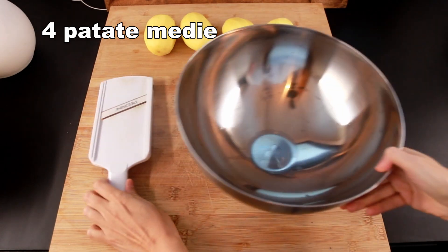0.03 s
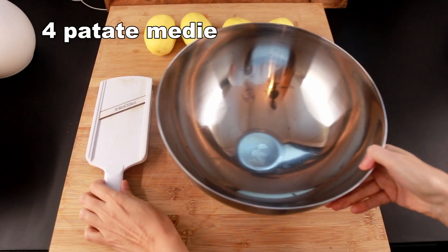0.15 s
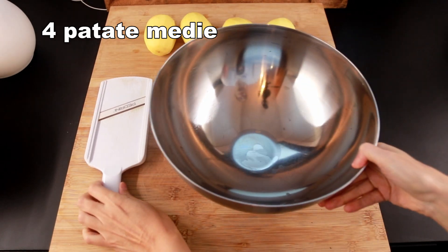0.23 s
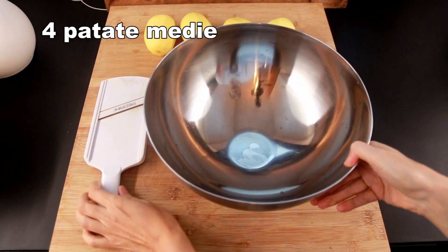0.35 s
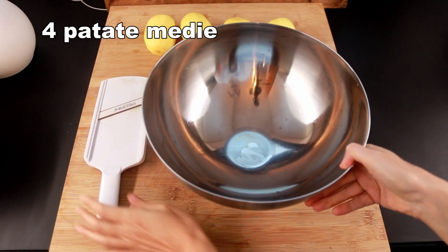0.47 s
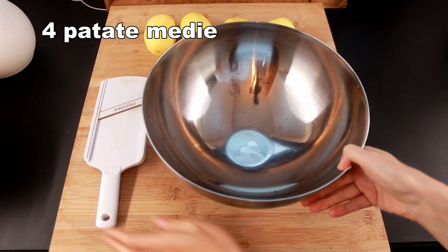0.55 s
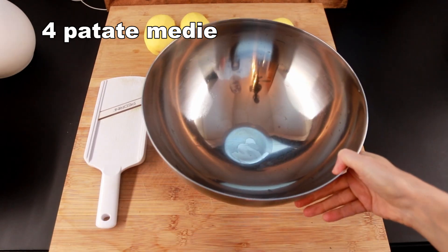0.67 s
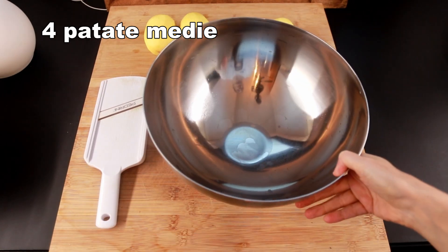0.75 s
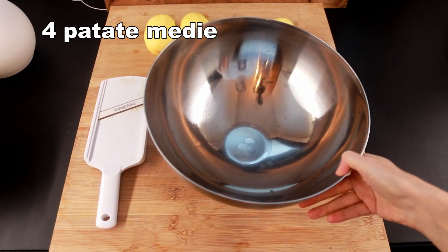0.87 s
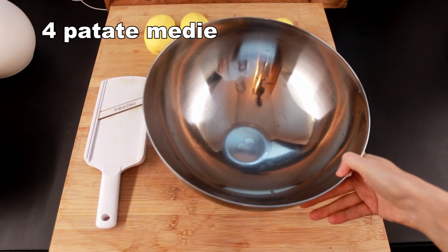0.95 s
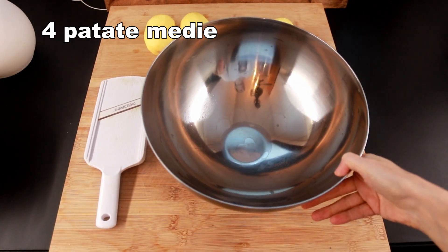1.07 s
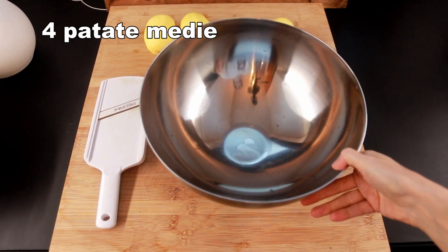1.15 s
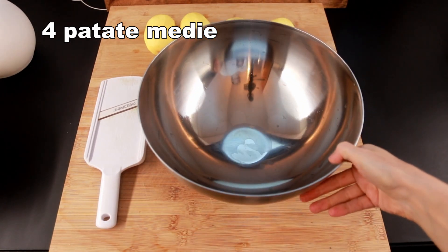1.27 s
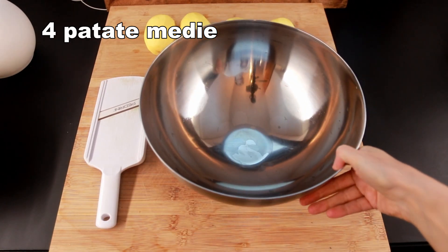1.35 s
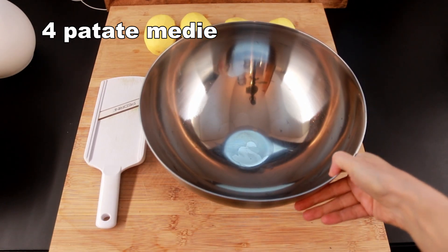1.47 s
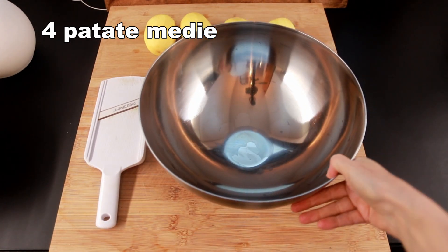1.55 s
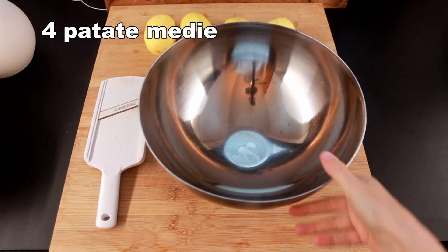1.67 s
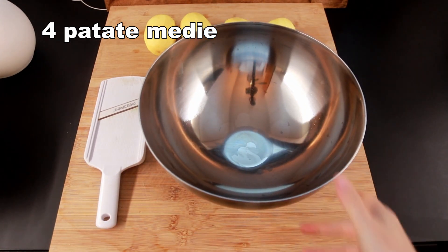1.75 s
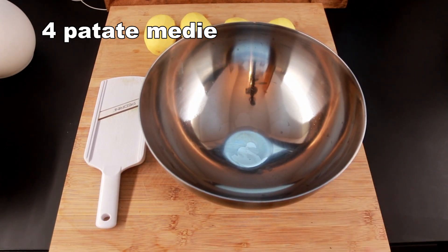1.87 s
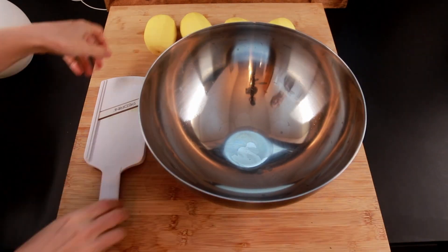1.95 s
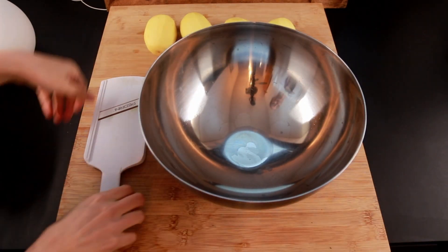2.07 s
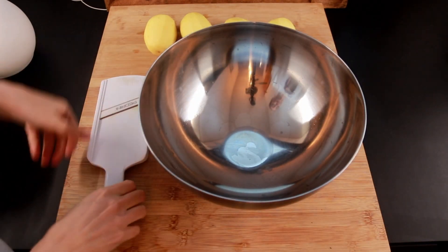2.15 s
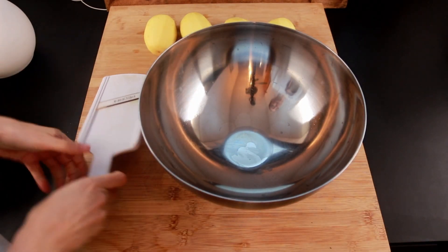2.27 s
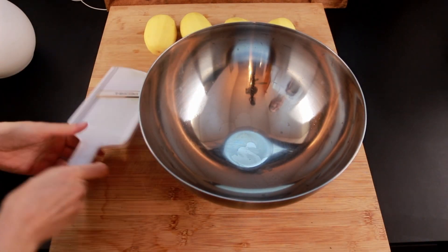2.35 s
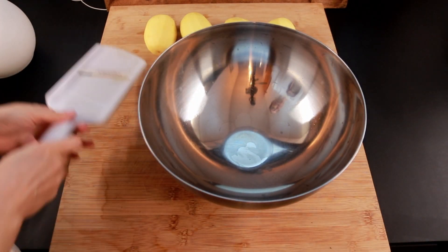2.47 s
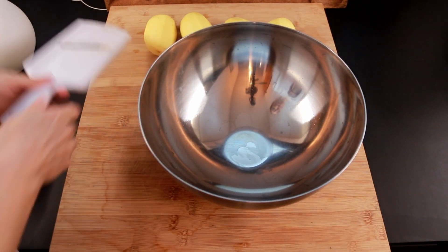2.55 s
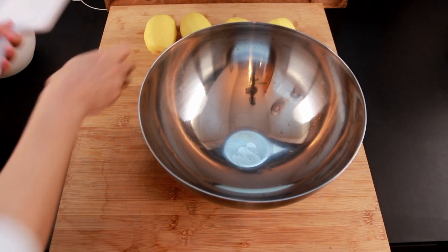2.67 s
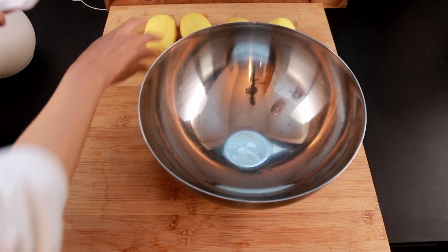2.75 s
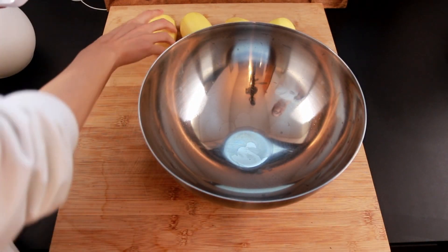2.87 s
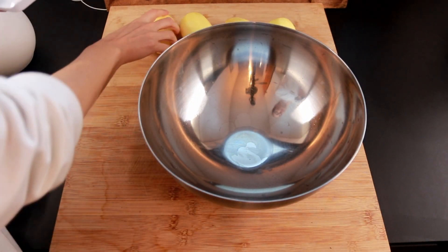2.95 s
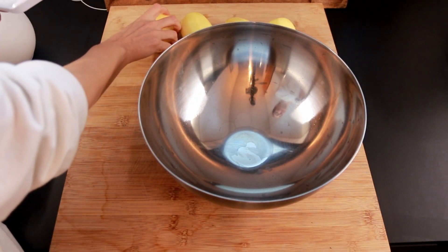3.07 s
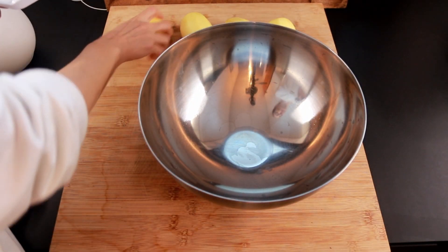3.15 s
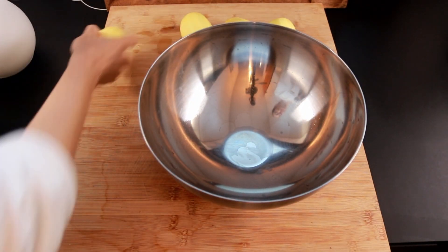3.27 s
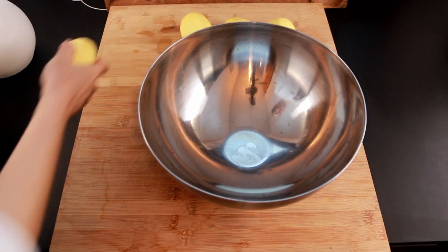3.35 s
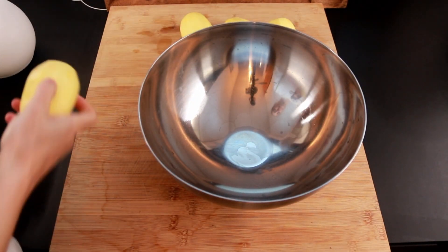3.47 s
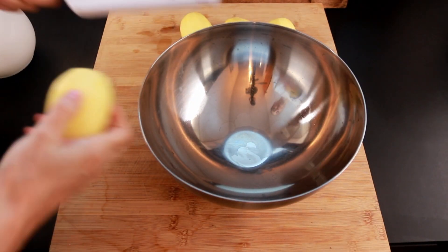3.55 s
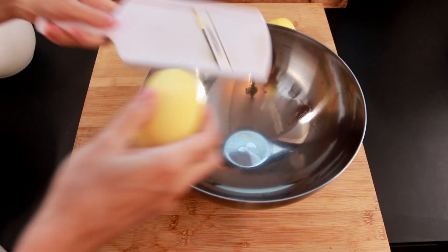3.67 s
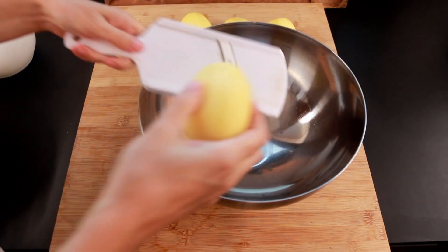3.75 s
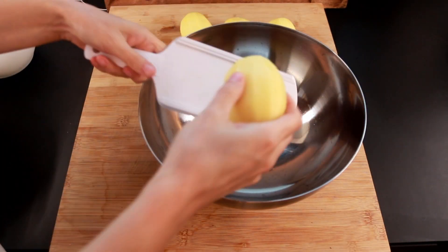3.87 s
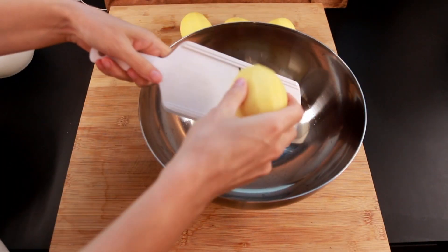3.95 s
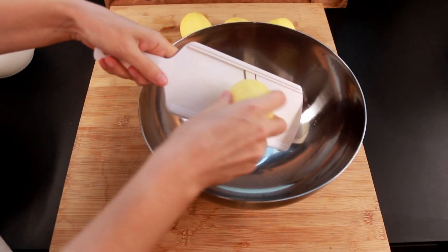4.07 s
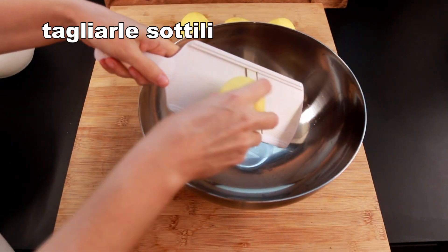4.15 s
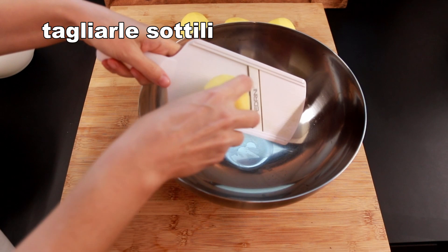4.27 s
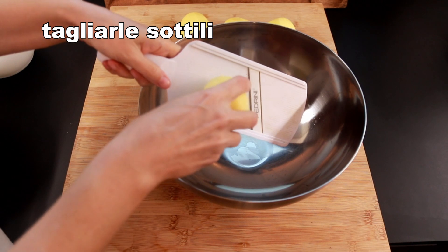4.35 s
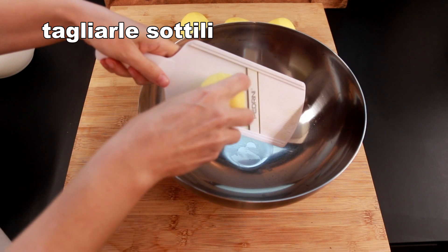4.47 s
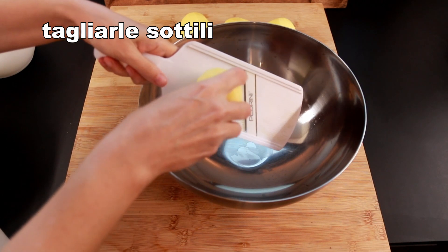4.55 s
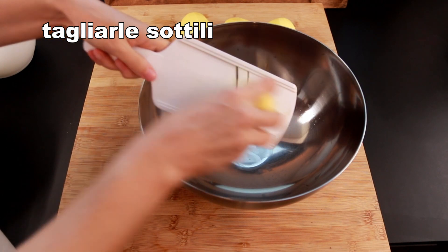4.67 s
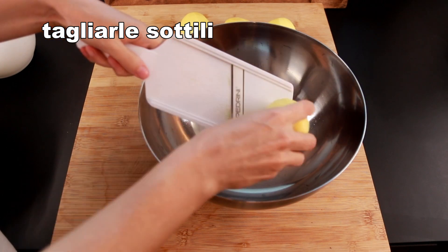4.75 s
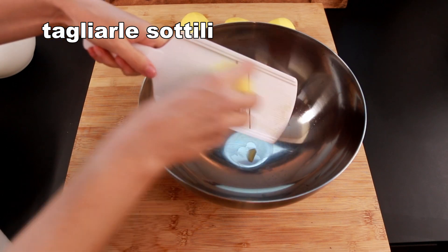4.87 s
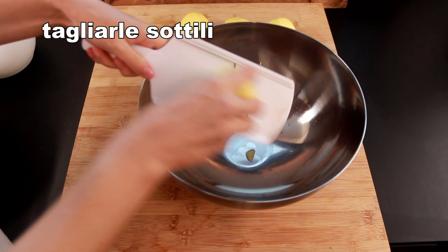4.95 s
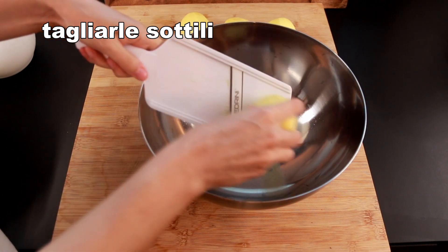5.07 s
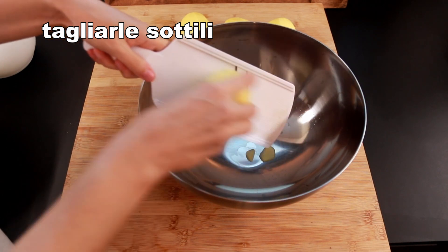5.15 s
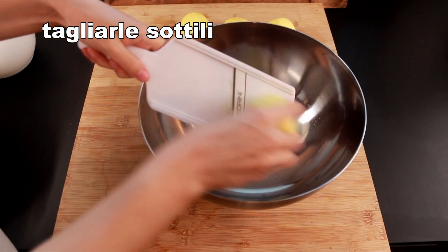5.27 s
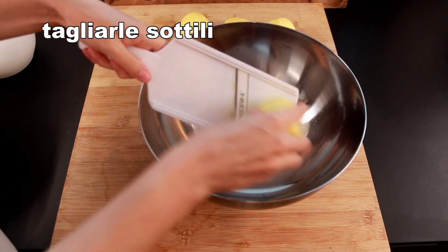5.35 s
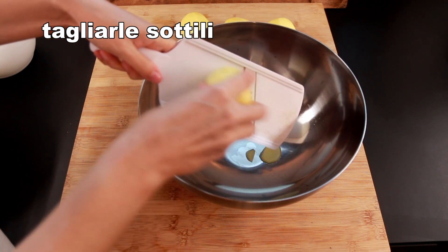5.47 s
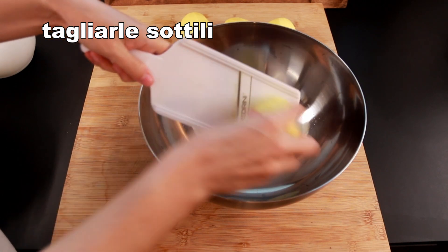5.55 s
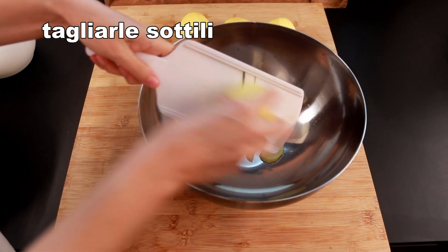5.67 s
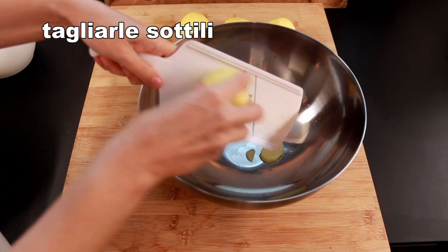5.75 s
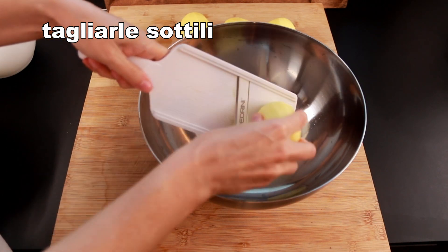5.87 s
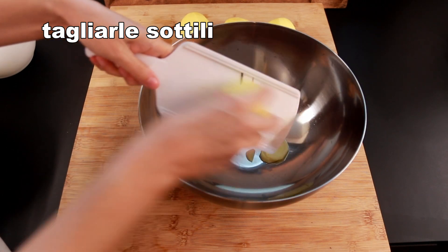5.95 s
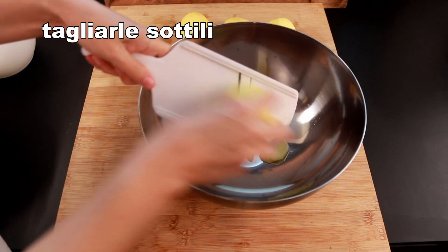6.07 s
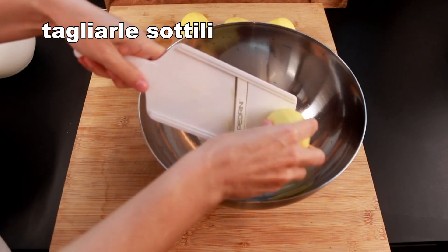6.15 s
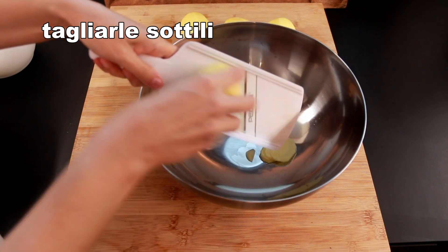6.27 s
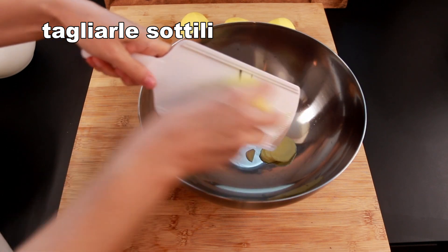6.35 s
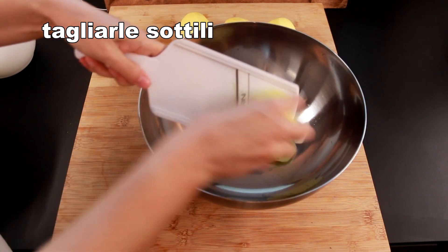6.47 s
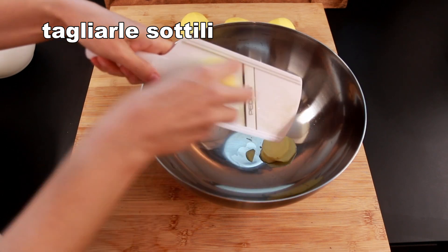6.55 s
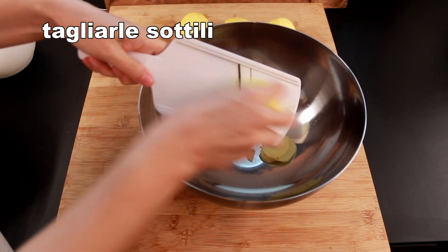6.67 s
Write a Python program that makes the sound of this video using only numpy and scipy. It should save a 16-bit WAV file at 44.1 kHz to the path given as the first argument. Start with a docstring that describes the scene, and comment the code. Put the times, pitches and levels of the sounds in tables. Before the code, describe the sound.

Plastic slicer clacks onto a wooden board, a steel bowl thumps down, then quick wet potato slicing strokes knock over the bowl in a quiet kitchen.

```python
"""A quiet kitchen, direct sound well above the room, stereo microphone: air, a far hum and soft rustle at first.
First a plastic slicer, then a steel bowl is set on a wooden board: hollow pops, ringing modes, cracks, thumps.
The slicer is picked up and rested on the bowl: slipping rattle, rubs, soft thuds, ticks and rim knocks.
Last a raw potato is cut in quick strokes over a low noisy bed: wet hiss from noise and crunches,
a snap at each cut, slices dropping on steel, and two bumps over the blade step on every return."""
import sys
import numpy as np
from scipy import signal
from scipy.fft import rfft, irfft
from scipy.io import wavfile

SR = 44100
rng = np.random.default_rng(int(sys.argv[2]) if len(sys.argv) > 2 else 0)


def unload_wav(signal):
    """Save mono or channel-first audio to the path in sys.argv[1] as 16-bit WAV at rate SR, clipped to [-1, 1]."""
    wavfile.write(
        sys.argv[1],
        SR,
        np.round(np.clip(np.atleast_2d(signal).T, -1, 1) * 32767).astype(np.int16),
    )


N = 296352
TIME = np.arange(N) / SR

# kitchen air, relative spectrum: (f/Hz, level/dB per Hz)
AIR_SPECTRUM = [(18, -34.5), (30, 0), (239, -5.5), (303, -3), (394, -7), (540, -11), (1430, -16.5),
                (3310, -22), (4080, -19), (13300, -27), (16000, -24)]
AIR_DB, AIR_SIDE_DB = -69.5, -15     # the side is relative to the middle
# far appliance tones: (f/Hz, level/dB)
HUM_TONES = [(388, -73), (405, -75.5)]
# soft rustle of sleeves and hands, then a low noisy bed under the slicing: (t/s, level/dB)
RUSTLE_AND_BED_LEVEL = [(0, -65), (.3, -53.5), (.86, -68), (1.25, -81), (1.45, -62.5), (2.02, -67),
                        (2.04, -80.5), (2.3, -60), (2.5, -67.5), (2.949, -65), (3.05, -76), (3.3, -75),
                        (3.5, -68.5), (3.72, -75.5), (3.76, -64.5), (4.02, -68.5), (4.3, -100), (4.75, -80),
                        (4.98, -67), (6.72, -58.5)]
# rustle and bed, relative spectrum: (f/Hz, level/dB per Hz)
RUSTLE_AND_BED_SPECTRUM = [(290, -54), (500, 2.5), (631, -4), (761, 0.5), (906, -2), (1640, 1), (3200, -6),
                           (4400, -3.5), (16000, -30.5)]

# slicer, then bowl, touching the board:
# (t/s, body level/dB, pop f/Hz, crack level/dB, thump level/dB, ring after the pop level/dB, favoured mode f/Hz)
SLICER_BLOWS = [(.101, -22, 2120, -39, -70.5, -18, 2000), (.18, -11.5, 440, -24.5, -26, -1.5, 1100),
                (.361, -11.5, 1210, -29, -24.5, 0.5, 1100)]
BOWL_BLOWS = [(1.359, -30.5, 226, -44, -51, -2, 226), (1.434, -24, 510, -39, -34, -2, 400),
              (1.515, -24, 376, -43.5, -35.5, -5.5, 297)]
# modes of each pair of bodies in contact: (f/Hz, level/dB, t60/s)
SLICER_BOARD_MODES = [(130.7, -17.5, 0.13), (221.5, -9.5, 0.25), (302, -13, 0.2), (488, -11.5, 0.23),
                      (1100, -13.5, 0.36), (1563, -12.5, 0.12), (1795, -10.5, 0.15), (2250, -17.5, 0.42),
                      (2310, -20.5, 0.23), (2424, -12.5, .2), (2560, -9, 0.1), (3300, -27.5, .12),
                      (4150, -24, 0.16), (4700, -26, 0.1), (5350, -29.5, .15)]
BOWL_BOARD_MODES = [(114, -20, 0.37), (226, 2, 0.24), (337.5, -5.5, 0.3), (380, -8, 0.24), (512, -1, 0.26),
                    (606, -3, 0.16), (870, 1.5, 0.12), (1057, 3, 0.049), (1500, 7, 0.027),
                    (2160, -4, 0.097), (2325, -1.5, 0.085), (2600, -15, 0.07)]
SLICER_BOWL_MODES = [(238.5, -5.5, 0.12), (410.4, 0.5, 0.037), (492.5, -8.5, 0.22), (599, -1.5, 0.067),
                     (770, -2.5, 0.027), (895, 2, 0.034), (960, -6, 0.065), (1012, -9, 0.18),
                     (1584, -5.5, 0.058), (2365, -18, 0.043), (2800, -10.5, 0.07), (4150, -16, .06)]
# decay of the room by band: (f/Hz, t60/s)
ROOM_DECAY = [(120, 0.81), (500, 0.55), (2000, 0.39), (5000, 0.47), (12000, 0.24)]
ROOM_DB = -13.5

# fingers sliding on steel: (t/s, length t/s, f/Hz, level/dB)
FINGER_SLIDES = [(0.693, 0.15, 5350, -68.5), (0.744, 0.073, 4150, -78), (1.097, 0.2, 6000, -78),
                 (3.08, 0.33, 5840, -84), (4.25, 0.86, 4150, -90)]
# soft thuds through the table: (t/s, peak level/dB, f/Hz)
TABLE_THUDS = [(1.81, -60, 56), (2.179, -55, 54.4), (2.309, -48, 80), (3.02, -53, 103),
               (3.079, -45.5, 47.5), (3.598, -58.5, 74.7)]
# slicer dragged or shifted: (t/s, level/dB, length t/s, centre f/Hz)
SLICER_DRAGS = [(1.848, -61.5, 0.025, 1500), (2.084, -61, 0.037, 1100), (2.273, -45.5, 0.025, 1000),
                (2.416, -50, 0.037, 1500), ]
# hands rubbing over board and slicer:
# (t/s, hiss level/dB, length t/s, rise t/s, dullness 0-1, fall t60/s)
HAND_RUBS = [(1.919, -57, 0.1014, 0.0022, 0.83, 0.008), (2.237, -53, 0.0058, 0.0011, 0, 0.36),
             (2.553, -67, 0.073, 0.0068, 0.35, 0.31)]
# potato or nail ticking on the blade: (t/s, level/dB, ring f/Hz)
BLADE_TICKS = [(1.9343, -34, 3300), (2.242, -32.5, 5600), (4.949, -27.5, 2540), (4.951, -28, 6130),
               (5.234, -36, 2910), (5.405, -38, 2850), (5.493, -26, 2570), (5.769, -36, 2600),
               (5.778, -30, 4700), (6.038, -39.5, 4530), (6.052, -25, 6060), (6.321, -25.5, 5770),
               (6.616, -40, 4600)]
TICK_T60_S, TICK_TAIL_S = 0.013, 0.18

# slicer knocking on the bowl rim, mostly as the hand turns:
# (t/s, body level/dB, pop f/Hz, thump level/dB, favoured mode f/Hz)
BOWL_RIM_KNOCKS = [(4.179, -38.5, 654, -37, 587), (4.452, -52, 1100, -86, 1000),
                   (4.937, -57, 423, -46, 400), (5.028, -39, 1800, -60, 2800), (5.102, -41, 925, -62, 1000),
                   (5.499, -34, 493, -43, 252), (5.78, -36.5, 424, -53, 250), (6.052, -29, 1380, -48, 600),
                   (6.304, -37, 470, -52, 250), (6.599, -38.5, 1460, -42, 1010)]
RIM_CRACK_DB, RIM_RING_DB = -16.5, 1.2     # crack relative to the body
# potato gliding over wet plastic between cuts: (t/s, hiss level/dB)
GLIDE_LEVEL = [(4.7, -96), (4.85, -69), (6.72, -68)]
# wet slicing hiss, relative spectrum: (f/Hz, level/dB per Hz)
HISS_SPECTRUM = [(710, -8), (1200, -16.5), (1380, -3.5), (2020, -7), (3080, -10), (4130, 6), (6440, -2.5),
                 (7100, -0.5), (12100, -4.5), (15000, -5.5), (16000, -54)]
# cuts down the blade, the slice snapping free shortly after the bite:
# (snap t/s, snap level/dB, ring after it level/dB, hiss level/dB, hiss length t/s)
BLADE_CUTS = [(4.815, -32, -4.5, -45.5, 0.023), (5.115, -20.5, -1.5, -41.5, 0.023),
              (5.374, -21, -25, -40.5, 0.027), (5.652, -28.5, -24, -40.5, 0.034),
              (5.934, -26.5, -25, -39.5, 0.042), (6.207, -20.5, -40, -38.5, 0.048),
              (6.492, -19.5, -9, -38.5, 0.042)]
BITE_TO_SNAP_S, CUT_RISE_S, CUT_DULLNESS, CUT_FALL_S = 0.017, 0.0076, 0.38, 0.071     # fall is a t60
SNAP_HZ, SNAP_CRACK_DB, SNAP_THUMP_DB, SNAP_FAVOURS_HZ = 855, -50, -45, 1000
# returns up the ramp, bumping twice over the step of the blade:
# (t/s, first bump level/dB, its favoured mode f/Hz, thump level/dB, gap t/s,
#  second bump level/dB, ring after it level/dB, hiss level/dB)
RAMP_RETURNS = [(4.977, -45, 600, -38, 0.013, -36.5, 3, -46),
                (5.259, -35, 600, -38, .018, -19.5, -16.5, -37.5),
                (5.536, -33.5, 630, -35, .016, -18.5, -11, -37),
                (5.811, -38.5, 1630, -31.5, .015, -21, -2.5, -42.5),
                (6.089, -28, 1540, -64, .015, -29, 11.5, -35),
                (6.371, -24.5, 1500, -34.5, 0.013, -23.5, 7.5, -30.5),
                (6.652, -22.5, 1500, -59, 0.013, -17.5, 7, -29.5)]
RETURN_LEAD_S, RETURN_HOLD_S, RETURN_RISE_S = 0.0017, 0.0037, 0.036
RETURN_DULLNESS, RETURN_FALL_S = 0.59, 0.058     # fall is a t60
FIRST_HZ, FIRST_CRACK_DB, FIRST_RING_DB = 690, -21, 7     # crack relative to the body
# second bump, thump relative to the body
SECOND_HZ, SECOND_CRACK_DB, SECOND_THUMP_DB, SECOND_FAVOURS_HZ = 808, -35.5, -17.5, 454
# slices dropping on steel: (t/s, body level/dB)
SLICE_LANDINGS = [(5.405, -40), (5.953, -24.5), (6.225, -24.5), (6.517, -34)]
LAND_HZ, LAND_CRACK_DB, LAND_THUMP_DB = 885, -26, -29     # crack and thump relative to the body
LAND_RING_DB, LAND_FAVOURS_HZ = 6, 600

SIDE_DB, LEAN_DB = -21, -36
MIC_LOW_HZ, CUTOFF_HZ = 63, 16300


def from_db(db):
    """Decibels to gain."""
    return 10 ** (np.asarray(db) / 20)


def rms_one(x):
    """Scale to unit rms."""
    return x / np.sqrt(np.mean(x ** 2) + 1e-20)


def unit_energy(x):
    """Scale to unit energy."""
    return x / np.sqrt(np.sum(x ** 2))


def at_hz(points, hz):
    """Read a table on a log-frequency axis."""
    table_hz, values = np.transpose(points)
    return np.interp(np.log(hz + 1), np.log(table_hz), values)


def coloured(spectrum, size=N):
    """Noise with the given spectrum, rms 1."""
    hz = np.fft.rfftfreq(size, 1 / SR)
    white = rng.standard_normal(size)
    return rms_one(irfft(rfft(white) * from_db(at_hz(spectrum, hz)), size))


def drift(rate):
    """Random wander at or below about the given rate in Hz, rms 1."""
    r = np.exp(-2 * np.pi * rate / SR)
    wander = signal.lfilter([1], [1, -2 * r, r * r], rng.standard_normal(N + SR))
    return rms_one(wander[SR:])     # the first second lets the filter settle


def band(x, low_hz, high_hz):
    """Butterworth band-pass."""
    return signal.sosfilt(signal.butter(2, [low_hz, high_hz], "band", fs=SR, output="sos"), x)


def dying(t, t60):
    """Fall of 60 dB in t60, never shorter than 3 ms."""
    return from_db(-60 * t / max(t60, .003))


def hold(s, length, rise, fall):
    """Envelope that swells, holds until length has passed, and dies."""
    t = np.maximum(TIME - s, 0)
    return np.minimum(t / max(rise, .001), 1) * dying(np.maximum(t - length, 0), fall)


def add(out, s, sound):
    """Mix a sound in at time s."""
    i = round(s * SR)
    out[i:i + len(sound)] += sound[:N - i]


def air(level_db):
    """Steady noise of the kitchen air."""
    return from_db(level_db) * coloured(AIR_SPECTRUM)


def hum():
    """A far appliance: two close tones that beat and waver."""
    out = np.zeros(N)
    for hz, level_db in HUM_TONES:
        phase = 2 * np.pi * hz * TIME + 0.27 * drift(1.7)
        out += from_db(level_db + 2.0 * drift(4)) * np.sin(phase)
    return out


def rustle_and_bed():
    """Soft rustle of sleeves and hands, then a low noisy bed under the slicing: noise of fluttering level."""
    s, level_db = np.transpose(RUSTLE_AND_BED_LEVEL)
    level = from_db(np.interp(TIME, s, level_db) + 0.82 * drift(47))
    return level * coloured(RUSTLE_AND_BED_SPECTRUM)


def clatter(size, spread_s):
    """A contact is a first touch followed by a few weaker bounces; unit energy."""
    t = np.arange(size) / SR
    bounce = (rng.random(size) < 600 / SR) * rng.choice([-.35, .35], size) * dying(t, spread_s)
    bounce[0] = 1
    return unit_energy(bounce)


def ringing_mode(t, hz, t60, rough):
    """One decaying mode, its strength wavering by chance as neighbouring modes would beat."""
    knots = np.arange(0, .6, 13.0 / hz)     # one every 13 cycles
    strengths = np.r_[.8, rng.uniform(-0.66, 1, len(knots) - 1)]
    waver = 1 - rough + rough * np.interp(t, knots, strengths)
    return waver * np.sin(2 * np.pi * hz * t) * dying(t, t60) * np.minimum(t / 0.0014, 1)


def blows(events, modes, pop_cycles, thump_hz, shudder_t60, crack_hz, crack_t60, focus_db, spread_s, rough):
    """Each blow: a hollow pop, the wavering modes of the body, a noisy crack and a low thump with its shudder."""
    out, t = np.zeros(N), np.arange(SR // 2) / SR
    for s, body_db, pop_hz, crack_db, thump_db, ring_db, favoured_hz in events:
        cycles = pop_hz * t / pop_cycles
        swell = (cycles * np.exp(1 - cycles)) ** 2     # swells, then dies in a few cycles
        body = np.sin(2 * np.pi * pop_hz * t) * swell
        for hz, level_db, t60 in modes:
            near_db = -focus_db * abs(np.log2(hz / favoured_hz))     # the point of contact favours some modes
            body += from_db(level_db + ring_db + near_db) * ringing_mode(t, hz, t60, rough)
        white = rng.standard_normal((2, len(t)))
        grit = rms_one(band(band(white[0], 600, crack_hz), 300, min(1.2 * crack_hz, 20000)))
        crack = grit * dying(t, crack_t60) * np.minimum(t / 0.0008, 1)
        contact = from_db(body_db) * body + from_db(crack_db) * crack
        sound = signal.fftconvolve(contact, clatter(2000, spread_s))
        shudder = .5 * rms_one(band(white[1], .7 * thump_hz, 3.13 * thump_hz)) * dying(t, shudder_t60)
        thump = np.sin(2 * np.pi * thump_hz * t) * dying(t, 0.0722) + shudder
        sound[:len(t)] += from_db(thump_db) * thump * np.minimum(t / 0.0068, 1)
        add(out, s, sound)
    return out


def slicer_set_down():
    """Plastic on wood: short pops and a bright crack."""
    return blows(SLICER_BLOWS, SLICER_BOARD_MODES, pop_cycles=0.97, thump_hz=135, shudder_t60=.3,
                 crack_hz=5600, crack_t60=0.13, focus_db=1.0, spread_s=0.029, rough=1.0)


def kitchen(x):
    """Diffuse tail: octave bands of noise, each dying at its own rate."""
    t = np.arange(round(.8 * SR)) / SR
    white = rng.standard_normal(len(t))
    tail = np.zeros(len(t))
    for hz in 50 * 2. ** np.arange(9):
        tail += band(white, hz / np.sqrt(2), hz * np.sqrt(2)) * dying(t, at_hz(ROOM_DECAY, hz))
    tail *= np.minimum(t / 0.002, 1)      # the first walls are some way off
    return signal.fftconvolve(x, unit_energy(tail))[:N]


def smear(dry):
    """A faint, short noisy smear of the direct sound, mostly treble, opposite in the two channels."""
    t = np.arange(400) / SR
    burst = rng.standard_normal(400) * dying(t, .01)
    treble = band(dry, 5000, 16000) + 0.17 * band(dry, 300, 5000)
    return from_db(SIDE_DB) * signal.fftconvolve(treble, unit_energy(burst))[:N]


def finger_slides():
    """Fingers sliding on steel: narrow noise, a thin breathy whistle."""
    out, white = np.zeros(N), rng.standard_normal(N)
    for s, length, hz, level_db in FINGER_SLIDES:
        whistle = rms_one(band(white, hz * .95, hz * 1.05))
        out += from_db(level_db) * hold(s, length, 0.035, 0.061) * whistle
    return out


def bowl_set_down():
    """Steel on wood: lower pops, a duller crack and a longer shudder."""
    return blows(BOWL_BLOWS, BOWL_BOARD_MODES, pop_cycles=1.47, thump_hz=115, shudder_t60=0.48,
                 crack_hz=2750, crack_t60=0.03, focus_db=2.5, spread_s=0.056, rough=1.0)


def table_thuds():
    """Soft pushes through the table: low tones under a smooth bell."""
    out = np.zeros(N)
    for s, peak_db, hz in TABLE_THUDS:
        push = (TIME - s) * hz / 1.3     # about three cycles
        out += from_db(peak_db) * np.exp(-push ** 2) * np.cos(2 * np.pi * hz * (TIME - s))
    return out


def drags():
    """Uneven slips, a few much larger than the rest, heard through the broad body of the slicer."""
    sizes = from_db(2.1 * rng.exponential(1, N).clip(0, 3))
    slips = (rng.random(N) < 3000 / SR) * rng.standard_normal(N) * sizes
    out = np.zeros(N)
    for s, level_db, length, hz in SLICER_DRAGS:
        rattle = rms_one(band(band(slips, hz / 6.9, hz * 1.68), 100, hz * 5.9))
        out += from_db(level_db) * hold(s, length, 0.00087, 0.15) * rattle
    return out


def strokes():
    """Hands rub, then the blade tears wet cells: crunchy hiss that creeps in, bites, holds, and trails off."""
    crunch = (rng.random(N) < 500 / SR) * rng.standard_normal(N)
    wet = coloured(HISS_SPECTRUM) * from_db(2.97 * drift(130))
    bright = wet + 0.36 * rms_one(band(crunch, 1700, 13500))
    dull = rms_one(band(bright, 360, 3740))
    out = from_db(np.interp(TIME, *np.transpose(GLIDE_LEVEL))) * bright
    for s, hiss_db, length, rise, dullness, fall in HAND_RUBS + passes():
        share = np.clip(dullness, 0, 1)
        approach = 0.092 * np.exp(-abs(TIME - s) / 0.011) * (s > 4.5)     # the potato slides up to the blade
        trail = 0.28 * hold(s, length, rise, 1.2 * fall)
        envelope = hold(s, length, rise, fall) + trail + approach
        out += from_db(hiss_db) * envelope * ((1 - share) * bright + share * dull)
    return out


def ticks():
    """A sharp broad click, then noise ringing shortly around one pitch."""
    out, t = np.zeros(N), np.arange(SR // 5) / SR
    for s, level_db, ring_hz in BLADE_TICKS:
        white = rng.standard_normal(len(t))
        snap = band(1. * (t == 0), 780, 4800)     # the instant of contact
        click = 10.8 * snap + 0.48 * rms_one(band(white, 560, 6800)) * dying(t, 0.08)
        decay = dying(t, TICK_T60_S) + .25 * dying(t, TICK_TAIL_S)
        ring = rms_one(band(white, ring_hz * 0.75, ring_hz * 1.13)) * decay
        add(out, s, from_db(level_db) * (0.37 * click + 0.44 * ring))
    return out


def knock_rows():
    """Rim knocks, snaps, bumps of the returns and landing slices, each as a row for blows()."""
    rows = []
    for s, db, hz, thump_db, mode_hz in BOWL_RIM_KNOCKS:
        rows.append((s, db, hz, db + RIM_CRACK_DB, thump_db, RIM_RING_DB, mode_hz))
    for s, db, ring_db, _, _ in BLADE_CUTS:
        rows.append((s, db, SNAP_HZ, SNAP_CRACK_DB, SNAP_THUMP_DB, ring_db, SNAP_FAVOURS_HZ))
    for s, first_db, mode_hz, thump_db, gap, second_db, ring_db, _ in RAMP_RETURNS:
        rows.append((s, first_db, FIRST_HZ, first_db + FIRST_CRACK_DB, thump_db, FIRST_RING_DB, mode_hz))
        rows.append((s + gap, second_db, SECOND_HZ, SECOND_CRACK_DB, second_db + SECOND_THUMP_DB,
                     ring_db, SECOND_FAVOURS_HZ))
    for s, db in SLICE_LANDINGS:
        rows.append((s, db, LAND_HZ, db + LAND_CRACK_DB, db + LAND_THUMP_DB, LAND_RING_DB, LAND_FAVOURS_HZ))
    return rows


def slicing_knocks():
    """Blows on the slicer and bowl together: contact strongly favours the nearest modes."""
    return blows(knock_rows(), SLICER_BOWL_MODES, pop_cycles=1.41, thump_hz=143.5, shudder_t60=0.16,
                 crack_hz=12600, crack_t60=0.029, focus_db=14.0, spread_s=0.031, rough=0.32)


def passes():
    """Every pass over the blade, cut or return, as a row like those of HAND_RUBS."""
    rows = []
    for s, _, _, hiss_db, length in BLADE_CUTS:
        rows.append((s - BITE_TO_SNAP_S, hiss_db, length, CUT_RISE_S, CUT_DULLNESS, CUT_FALL_S))
    for s, _, _, _, gap, _, _, hiss_db in RAMP_RETURNS:
        rows.append((s - RETURN_LEAD_S, hiss_db, gap + RETURN_HOLD_S,
                     RETURN_RISE_S, RETURN_DULLNESS, RETURN_FALL_S))
    return rows


def scene():
    """A nearly central image, leaning slightly right; treble and air differ a little between the channels."""
    dry = slicer_set_down() + bowl_set_down() + drags() + strokes() + ticks() + slicing_knocks()
    mid = dry + from_db(ROOM_DB) * kitchen(dry)
    mid += air(AIR_DB) + hum() + rustle_and_bed() + finger_slides() + table_thuds()
    side = smear(dry) - from_db(LEAN_DB) * dry + air(AIR_DB + AIR_SIDE_DB)
    return np.array([mid + side, mid - side])


def record(dry):
    """The microphone loses the deep bass; the top is cut steeply."""
    thin = signal.sosfilt(signal.butter(2, MIC_LOW_HZ, "high", fs=SR, output="sos"), dry)
    return signal.sosfilt(signal.cheby2(14, 60, CUTOFF_HZ, fs=SR, output="sos"), thin)


dry = scene()
out = record(dry)
unload_wav(out)
```